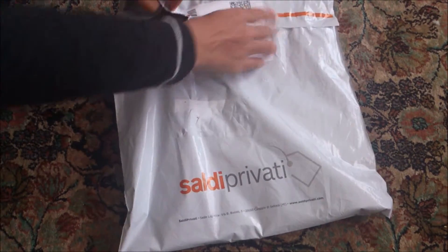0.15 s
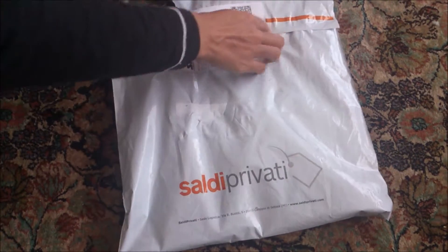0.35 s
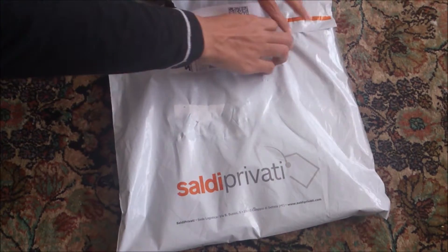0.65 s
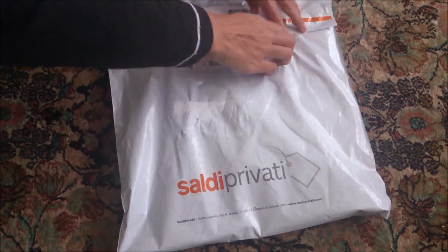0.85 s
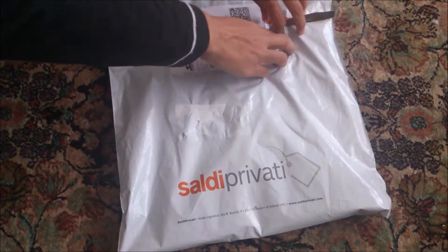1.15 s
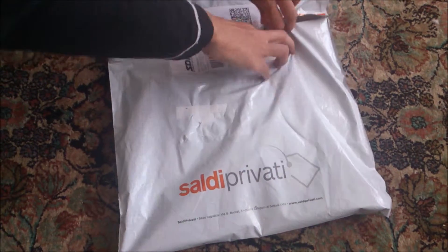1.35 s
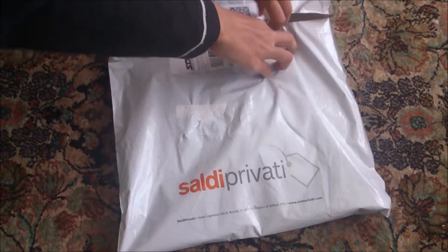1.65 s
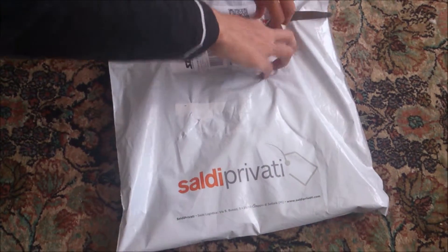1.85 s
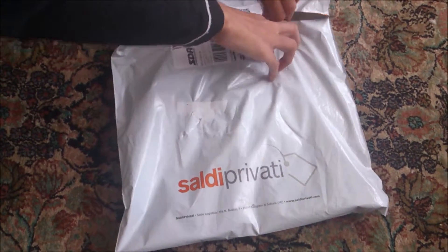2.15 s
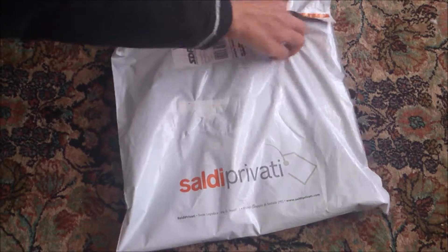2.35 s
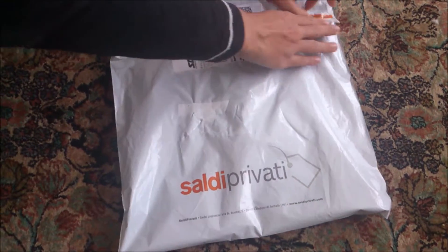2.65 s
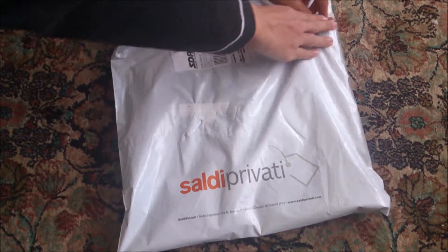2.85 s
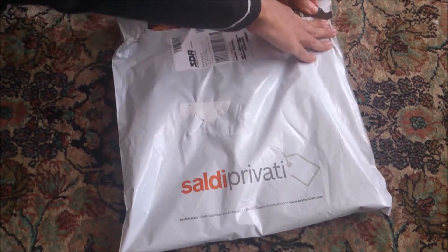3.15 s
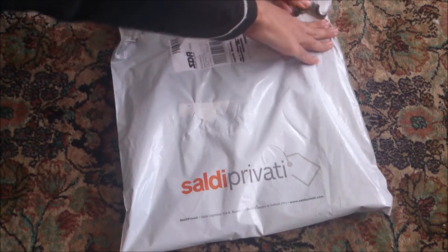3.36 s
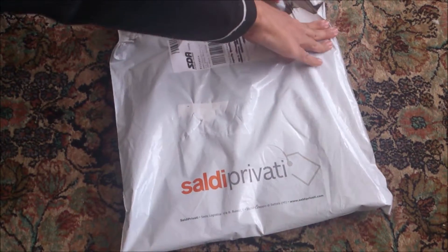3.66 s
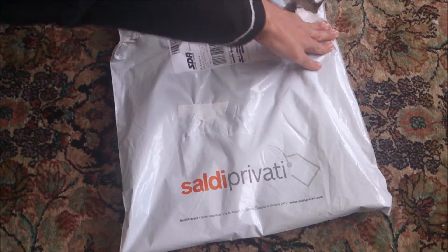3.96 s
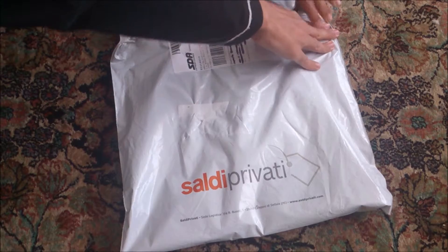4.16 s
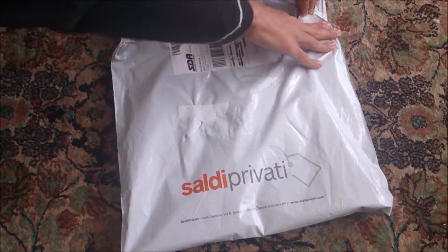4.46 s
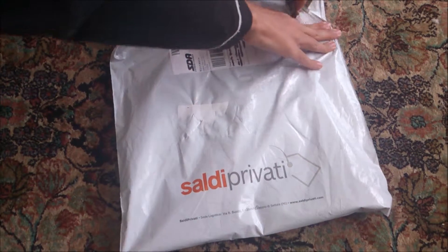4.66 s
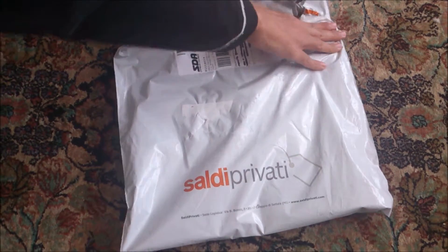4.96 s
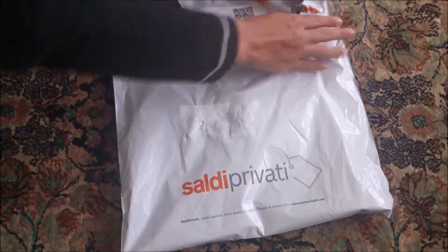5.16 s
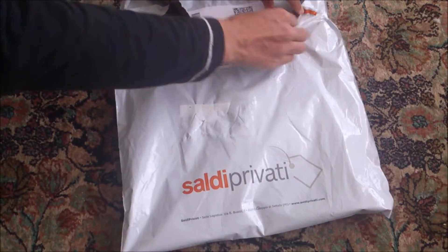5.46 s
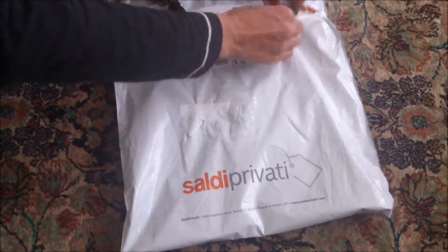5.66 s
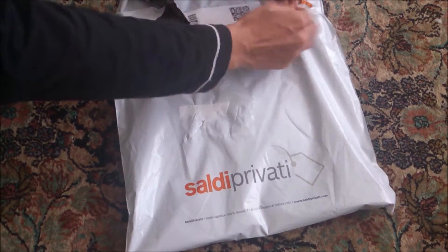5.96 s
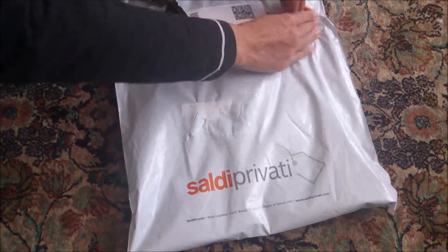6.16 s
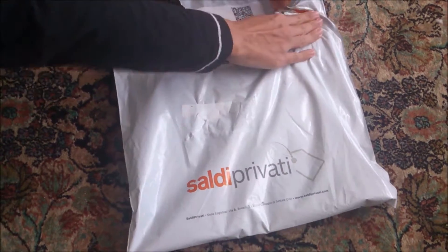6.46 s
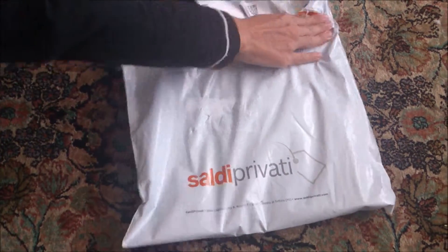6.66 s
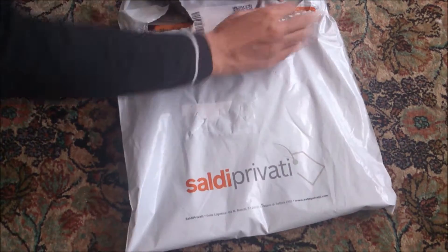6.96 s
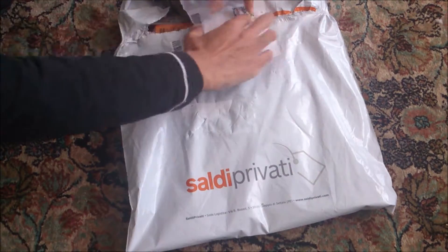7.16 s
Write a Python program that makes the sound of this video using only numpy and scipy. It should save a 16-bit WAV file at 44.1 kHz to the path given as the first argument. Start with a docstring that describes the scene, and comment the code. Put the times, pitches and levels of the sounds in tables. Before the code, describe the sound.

Thin plastic packaging crackles and rustles close up as fingers pick and pull it open, its crisp snaps ringing briefly off indoor walls.

```python
"""Opening a plastic mailer bag

Two hands pick at the taped flap of a plastic mailer bag on a carpet and tug it open, in a fairly live room.
Sharp snaps, some following each other in quick runs and some repeated by a flutter echo about 12 ms apart,
stand over tiny crinkles and sliding film; two hard pulls stand out. Each snap is a short push that rings a
small facet, the panel around it and the air in the bag. Early echoes, a diffuse tail and one low standing wave
form the room; faint noise and a whine lie beneath."""
import sys
import numpy as np
from scipy import signal
from scipy.fft import rfft, irfft
from scipy.io import wavfile
from scipy.ndimage import uniform_filter1d

SR = 44100
rng = np.random.default_rng(int(sys.argv[2]) if len(sys.argv) > 2 else 0)


def to_wav(sig):
    """Store sig (one row per channel, or 1-D mono) as 16-bit WAV at the path in sys.argv[1].

    Samples outside -1..1 are clipped; the rate is SR.
    """
    pcm = np.clip(np.atleast_2d(sig), -1, 1) * 32767
    pcm = np.round(pcm).astype(np.int16)
    wavfile.write(sys.argv[1], SR, pcm.T)  # frames by channels


N = 322371
TIME = np.arange(N) / SR  # s
FRAME = 1024  # samples in the impulse response of one patch of film
FRAME_S = np.arange(FRAME) / SR
FRAME_HZ = np.arange(FRAME // 2 + 1) * SR / FRAME + 1  # 1 Hz up, to avoid division by zero

# Spectrum of the background noise. Each row: frequency in Hz, relative density in dB.
NOISE_SPECTRUM = [(25, -17), (50, -8), (100, 3.5), (220, -1), (350, 3.5), (560, -4.5), (750, -3),
                  (1100, -8.5), (3100, -6.5), (6200, -2.5), (11000, -9), (16000, -13.5)]
NOISE_DB = -60  # mean level, about which it wavers
WHINE_HZ, WHINE_DB = 12306, -74.5

# Diffuse tail of the room by band. Each row: centre in Hz, 60 dB decay time in s, level in dB.
ROOM_BANDS = [(144, 0.4, 7.5), (530, 0.65, 1), (1510, 0.7, 1), (3500, 0.78, 0.5), (6370, 0.68, -3),
              (9900, 0.6, -2.5), (15800, 0.6, -0.5)]
# Early echoes from nearby surfaces. Each row: delay in s, level in dB.
EARLY_ECHOES = [(.0028, -25), (.0093, -13), (0.012, -34)]
ROOM_MODE_HZ, ROOM_MODE_T60, ROOM_MODE_DB = 360, 0.29, -17  # Hz, s, dB

# Bumps of the parcel on the carpet. Each row: start in s, level in dB, starting pitch in Hz.
PARCEL_BUMPS = [(0.5, -57, 132), (2.13, -68, 190), (2.244, -69, 181), (4.615, -61, 84.3),
                (5.335, -66, 139.9), (6.955, -61, 102)]

# Puffs of the slack bag giving under a hand. Each row: start in s, level in dB.
SLACK_PUFFS = [(.795, -24.5), (1.666, -24), (2.138, -23), (2.248, -22), (2.43, -24.5), (2.475, -30.5),
               (3.999, -19), (4.011, -20), (6.645, -23), (6.675, -18.5)]
PUFF_HZ, PUFF_Q, PUFF_DECAY_S = 410, 0.31, 0.028

# Narrow resonances excited by fingers dragging over the taut flap. Each row: frequency in Hz, Q, level in dB.
DRAG_RESONANCES = [(2550, 5.3, -69.5), (6900, 9.9, -61)]
DRAG_START_S, DRAG_LENGTH_S = .16, .52

# Resonances of the film: sharp crease edge, panel, air pocket, slack of the whole bag.
EDGE_HZ, EDGE_Q, EDGE_DB = 9200, 0.98, -20  # dB relative to the facet, in crinkles and sliding
PANEL_HZ, PANEL_Q = 1980, 0.77
POCKET_HZ, POCKET_Q = 815, 0.94
SLACK_HZ, SLACK_Q, SLACK_DB = 380, 0.57, -10.5  # dB relative to the air pocket

# Pushes and pulls of the hands on the film. Each row: start in s, length in s, effort in dB,
# central facet ring in Hz, panel and air pocket in dB relative to the facet; crinkles shift the pocket slightly.
HAND_GRIPS = [(0, .05, -54, 5800, -11, -13), (0.242, .1, -61, 5880, -7, -7), (.6, .15, -58, 6200, -9, -14),
              (0.796, .14, -54, 6300, -9.5, -13), (.97, .04, -49, 6540, -14.5, -11),
              (1.1, .22, -49, 6700, -15.5, -18.5), (1.358, .03, -41, 6400, -7.5, -18),
              (1.44, .06, -55, 6560, -10, -8.5), (1.675, .012, -44, 6670, -21, -19),
              (1.746, .2, -51.5, 6140, -16, -17.5), (1.975, .035, -45, 5800, -13, -34),
              (2.06, .13, -53.5, 6000, -4.5, -7), (2.26, .1, -47.5, 5860, -25, -15.5),
              (2.4, .07, -48, 6100, -8, -13), (2.72, .17, -56.5, 5570, -5.5, -13),
              (2.97, .05, -40.5, 5860, -15.5, -14.5), (3.1, .21, -52.5, 6300, -9.5, -16),
              (3.35, .06, -47, 5400, -8.5, -10), (3.582, .19, -52.5, 6360, -26, -24),
              (4.28, .07, -56.5, 5400, -10, -20), (4.385, .13, -49.5, 6060, -8.5, -12.5),
              (4.561, .05, -48, 6100, -15, -21), (4.66, .06, -52, 7000, -13, -35),
              (4.775, .025, -33, 6600, -11.5, -26), (4.879, .24, -52, 6500, -11, -18),
              (5.145, .045, -46, 6300, -10.5, -13.5), (5.52, .12, -53, 6240, -12, -12),
              (5.73, .07, -48, 6100, -9, -15), (5.93, .14, -48.5, 5900, -8, -16.5),
              (6.11, .08, -53, 5930, -10, -6.5), (6.235, .075, -44.5, 6640, -11.5, -13.5),
              (6.54, .04, -57, 5000, -20, -20), (6.655, .023, -27, 6700, -16, -17),
              (6.71, .045, -40, 6500, -10, -12), (6.865, .05, -45, 6400, -5.5, -10.5),
              (7.13, .18, -59, 6080, -4.5, -15.5)]
GRIP_ATTACK_DB_PER_S, GRIP_RELEASE_DB_PER_S = 620, 290
# Hands lying on the bag between grips. The one row: effort in dB, central facet ring in Hz,
# panel and air pocket in dB relative to the facet; crinkles shift the pocket slightly.
RESTING_HANDS = (-74, 5802, 4, -1)

# Sharp snaps of the film, including flutter echoes that repeat a snap about 12 ms later. Each row: start in s,
# level in dB, facet ring in Hz, crease edge in dB, panel in dB and air pocket in dB relative to the facet, all
# dB before common offsets.
FILM_SNAPS = [(0.0556, -23, 6800, -16, -10, -29), (.2469, -16, 5800, -28, -21, -19),
              (.319, -22, 5470, -27, -7, -15), (0.6487, -15.5, 6000, -16, -29, -40),
              (.879, -17, 6330, -20, -29, -28), (.936, -20.5, 6400, -20, -27, -32),
              (0.9722, -15.5, 5670, -2.5, -14, -17), (1.084, -23.5, 5640, -7, -9, -7),
              (1.1096, -23, 7450, -25, -5, -17), (1.1294, -9.5, 6840, -25, -18, -18.5),
              (1.1522, -11, 6080, -14, -30, -24), (1.173, -18, 6170, -25, -31, -30),
              (1.1956, -4, 6600, -30, -35, -27), (1.3115, -13, 7800, -25, -30, -23),
              (1.3572, -10.5, 6040, -25, -8, -30), (1.3738, -17.5, 4870, 0, 0, -29),
              (1.388, -12, 5100, -25, -16, -23), (1.405, -9.5, 5400, -9, -16, -20),
              (1.5203, -18.5, 6500, -10, -14, -15), (1.6664, -13, 6100, -7, -5, -6.5),
              (1.6753, -12.5, 6300, -9, -8, -8.5), (1.6822, -11, 6800, -25, -13, -25),
              (1.748, -25, 6700, -14, -12, -14), (1.7737, -20, 6500, -20, -21, -33),
              (1.803, -15, 6000, -16, -23, -13), (1.8167, -32.5, 6300, -20, -8, -14),
              (1.8573, -24, 6300, -17, -10, -12), (1.901, -16.5, 6360, -25, -25, -25),
              (1.9218, -13, 5300, -11, -10, -20), (1.938, -24, 6400, 0, -3, -23),
              (1.9526, -21, 5700, -6, -13, -23), (1.9682, -8, 5400, -27, -27, -35),
              (1.9756, -14, 6200, -25, -14, -27), (1.982, -9, 6700, -25, -31, -42),
              (2.029, -21.5, 7150, 2, -10, -34), (2.101, -20.5, 5200, -22, -14, -32),
              (2.1374, -12.5, 5400, -25, -16, -14), (2.1876, -20, 6293, -6, -22, -17),
              (2.248, -6, 5463, -13.5, -12, -25), (2.3103, -17, 6800, -18, -16, -38),
              (2.3285, -8.5, 6900, -4.5, -9.5, -41), (2.3378, -20, 6500, -10, -10, -38),
              (2.4178, -16, 6550, -14, -18, -39), (2.4336, -17, 6000, -25, -4.5, -9),
              (2.4837, -17, 5630, -14, -6, -16), (2.592, -23, 7200, -22.5, -43, -10),
              (2.7126, -18, 6260, -6, -16, -23), (2.726, -30, 6800, -4, -19, -26),
              (2.7787, -16, 5560, -13, -35, -30), (2.7863, -18.5, 5600, -25, -23, -26),
              (2.8207, -23, 5900, -25, -27, -36), (2.8413, -23, 5900, -16, -28, -33),
              (2.8621, -13, 7500, -22, -17, -21), (2.9442, -5.5, 6800, -28, -12.5, -22),
              (2.9497, -18, 7000, -25, -17, -38), (2.9738, -17, 7600, -5, -5, -32),
              (2.9825, -9, 7200, -25, -28, -24), (2.9863, -10, 6500, -17, -25, -40),
              (2.9933, -10, 6500, -25, -13, -28), (3.0107, -10.5, 6600, -27, -9, -34),
              (3.089, -18.5, 5900, -25, -4, -30), (3.1629, -13.5, 5160, -5, -10, -16),
              (3.176, -13.5, 5330, -6, -15, -22), (3.1864, -18, 7000, -13, -25, -25),
              (3.246, -8.5, 6500, -24, -31, -28), (3.26, -20, 7500, -9, -30, -36),
              (3.2775, -23, 5600, 2, -24, -28), (3.297, -19, 5500, -1.5, -28, -30),
              (3.3508, -20, 6800, -15, -5, -10), (3.3609, -5.5, 4760, -6, -7.5, -17),
              (3.3728, -13, 4600, -4, -19, -27), (3.4007, -15.5, 6720, -23, -15, -13),
              (3.4327, -15, 5800, -30, -17, -26), (3.5548, -14.5, 5700, -6, -8, -14.5),
              (3.563, -14.5, 5600, -9, -8, -17), (3.6025, -21, 5960, -25, -9, -26),
              (3.6587, -20.5, 6900, -3, -11, -25), (3.7128, -11.5, 5700, -11, -16, -22),
              (3.7264, -19, 5760, -17, -20, -28), (3.752, -13.5, 5690, -8, -11, -35),
              (3.7684, -7, 4900, -9, -5.5, -35), (3.784, -10, 4860, -10, -1.5, -32),
              (3.9688, -21, 6900, -10, -19, -9), (3.9787, -13.5, 6920, -16, -7, -14),
              (3.9883, -5, 5830, -24, -15.5, -18), (3.9995, -7, 7040, -23, -5, -8.5),
              (4.0122, -7, 6800, -25, -21, -8), (4.1666, -25, 6800, -12, -20, -16),
              (4.2268, -30, 5650, -22, -17, -16), (4.244, -21, 5300, -20, -18, -12),
              (4.3, -17, 5870, -16, -31, -33), (4.385, -19, 5600, -20, -22, -24),
              (4.3904, -13.5, 8040, -18, -0.5, -4.5), (4.395, -23, 7900, -11, 0, 2),
              (4.3996, -17, 6540, -28, -18, -26), (4.4375, -20, 6100, -14, -6, -28),
              (4.4453, -18.5, 6200, -15, 3, -5), (4.458, -19, 5200, -13, -3, -16),
              (4.4772, -18, 6100, -25, -23, -30), (4.4865, -13, 6650, -25, -30, -30),
              (4.5015, -18, 6900, -18, -17, -17), (4.5175, -19, 6900, -16, -21, -14),
              (4.5575, -21, 7300, -5, -10, -18), (4.569, -20, 7400, -3, -5, -20),
              (4.5817, -10, 5750, -7, -15, -22), (4.588, -11, 5330, -25, -2, -10.5),
              (4.6006, -22, 6300, -20, -14, -31), (4.643, -17, 6900, -4, -24, -24),
              (4.6484, -12.5, 6500, 0, -11, -31), (4.7181, -13, 6340, -3, -28, -32),
              (4.7257, -21, 6900, -10, -28, -36), (4.7561, 7, 6800, -23, -8.5, -21),
              (4.7681, 8, 6120, -27, -22, -24), (4.781, -2, 6000, -25, -27, -28),
              (4.7926, -3, 6860, -18, -15, -22), (4.831, -6.5, 6485, -5, -26, -26),
              (4.8555, 7, 6150, -27, -7, -21.5), (4.8839, -5, 6200, -25, -24, -32),
              (5.048, -15.5, 7000, -2, -23, -33), (5.1466, -14, 5660, -23, -13, -33),
              (5.152, -15.5, 6150, -18, -5, -20), (5.1664, -20, 6800, -10, -11, -19),
              (5.1911, -19.5, 6100, -5, -3.5, -32), (5.3829, -24.5, 6900, -29, -27, -37),
              (5.439, -21, 5260, -10, -4.5, -12.5), (5.4994, -19, 5460, -28, -9, -36),
              (5.5049, -20, 6000, -14, -22, -36), (5.509, -25, 7300, -8, -20, -34),
              (5.5248, -20, 6470, -18, -20, -27), (5.5396, -19, 6350, -28, -8, -15),
              (5.579, -25, 6800, -13, -22, -28), (5.7174, -9, 6400, -28, -11.5, -16.5),
              (5.7468, -19, 6200, -19, -26, -35), (5.762, -11.5, 5450, -25, -25, -34),
              (5.7808, -27, 5800, -17, -21, -24), (5.8054, -20, 6100, -27, -11, -24),
              (5.8564, -12, 6410, -10, -11, -11.5), (5.9218, -15, 6640, -14, -12, -20),
              (5.926, -18.5, 6500, -14, -8, -17), (5.9601, -8.5, 5570, -17, -10.5, -17),
              (5.9833, -18, 5400, -28, -19, -36), (6.0013, -18, 7570, -27, -27, -26),
              (6.017, -15.5, 7580, -25, -27, -30), (6.0251, -19, 7000, -8, -25, -15),
              (6.046, -12.5, 5100, -5.5, -6, -38), (6.06, -19, 5800, -13, -10, -40),
              (6.0698, -23, 6500, -16, -3, -17), (6.0826, -24, 6400, -28, -24, -34),
              (6.1176, -16, 6060, -30, -26, -38), (6.125, -15, 6360, -6, -27, -28),
              (6.1965, -12, 6350, -1, -7, -36), (6.2417, -16, 5530, -10, -7, -23),
              (6.2614, -16, 5490, -15, -14, -26), (6.2697, -25, 6400, -22, -14, -12),
              (6.5743, -18.5, 6060, 1.5, -10, -33), (6.5975, -7, 7660, -15, -20, -28),
              (6.5999, -4, 5460, -2.5, -10, -15.5), (6.6193, -12, 7400, -12, -23, -30),
              (6.6206, -4, 5540, -4, -10.5, -16), (6.6425, 1.5, 8600, -25, -7.5, -24),
              (6.6544, -6, 7400, -10, -14, -24), (6.661, -4, 6000, 0.5, -10, -13),
              (6.666, -3.5, 5500, -6, -16, -27), (6.6783, -11, 8200, -12, -20, -26),
              (6.721, -11, 8000, -6, -9, -29), (6.731, -9.5, 8000, -8, -16, -19),
              (6.8223, -17, 6490, -14, -11, -29), (6.89, -10, 7560, -18, -27, -29),
              (6.895, -10.5, 7200, -27, -24, -18), (6.937, -14, 7410, -31, -6, -4),
              (7.2214, -22, 7300, -24, -21, -31), (7.2412, -20.5, 6900, -10, -10.5, -22)]

CEILING = 1.25  # amplitude at which the microphone saturates
MIC_HZ, TOP_HZ = 12840, 15900  # gentle roll-off, steep cut


def undb(db):
    """Amplitude ratio of a level in dB."""
    return 10 ** (np.asarray(db) / 20)


def unit(x):
    """Normalization: scale to an rms of 1."""
    return x / np.sqrt(np.mean(np.abs(x) ** 2))


def add(out, at_s, sound):
    """Superposition: mix a sound in at a time."""
    start = max(int(at_s * SR), 0)
    part = out[start:start + len(sound)]
    part += sound[:len(part)]


def walk(rate):
    """Smoothed random process: levels held for 1 / rate s and slewed twice, with a spread near 1."""
    hold = int(SR / rate)
    steps = np.repeat(rng.standard_normal(N // hold + 1), hold)
    slewed = uniform_filter1d(uniform_filter1d(steps, hold), hold)
    return unit(slewed)[:N]


def resonance(hz, q):
    """Damped resonance: a broad, steep-sided power response with a mean of 1."""
    detuning = FRAME_HZ / hz - hz / FRAME_HZ
    return unit(1 / (1 + (q * detuning) ** 2)) ** 2


def ring(power):
    """Minimum phase: the causal impulse response that has this power spectrum, by folding its cepstrum."""
    cepstrum = irfft(np.log(power + 1e-7) / 2)
    cepstrum[1:FRAME // 2] *= 2
    cepstrum[FRAME // 2 + 1:] = 0
    return irfft(np.exp(rfft(cepstrum)))


def background():
    """Stationary noise shaped by its spectrum and wavering slightly, plus a thin, high, unsteady whine."""
    hz, db = np.transpose(NOISE_SPECTRUM)
    bins_hz = np.arange(N // 2 + 1) * SR / N + 1
    shape = undb(np.interp(np.log(bins_hz), np.log(hz), db))
    noise = irfft(rfft(rng.standard_normal(N)) * shape, N)
    whine = np.sin(2 * np.pi * np.cumsum(WHINE_HZ + 22 * walk(150)) / SR)
    return undb(NOISE_DB + 2.02 * walk(6.8)) * unit(noise) + undb(WHINE_DB) * unit(whine)


def room_tail(build_s=0.0061):
    """Diffuse reverberation: noise that builds up in milliseconds and decays at its own rate in each band."""
    t = TIME[:SR]
    bins_hz = np.arange(SR // 2 + 1) + 1
    noise = rfft(rng.standard_normal(SR))
    centres = np.log(np.array(ROOM_BANDS)[:, 0])
    tail = 0
    # overlapping triangular bands on a logarithmic frequency axis
    for share, (_, t60, db) in zip(np.eye(len(ROOM_BANDS)), ROOM_BANDS):
        band = irfft(noise * np.interp(np.log(bins_hz), centres, share))
        fade = np.exp(-np.log(1000) * t / t60) * (1 - np.exp(-(t / build_s) ** 2))
        tail = tail + undb(db) * band * fade / np.linalg.norm(fade)
    return tail


def room_mode():
    """Standing wave: a low, exponentially damped sine as an impulse response."""
    t = TIME[:SR]
    mode = np.sin(2 * np.pi * ROOM_MODE_HZ * t) * np.exp(-np.log(1000) * t / ROOM_MODE_T60)
    return undb(ROOM_MODE_DB) * mode / np.linalg.norm(mode)


def bumps(swell_s=0.018, sink_s=0.07):
    """Low-frequency thuds of the filled bag: short swells that sink in pitch as it settles."""
    out, t = np.zeros(N), TIME[:SR // 8]
    swell = (t / swell_s * np.exp(1 - t / swell_s)) ** 2
    for at_s, db, hz in PARCEL_BUMPS:
        cycles = np.cumsum(hz * np.exp(-t / sink_s)) / SR
        add(out, at_s, undb(db) * swell * np.sin(2 * np.pi * cycles))
    return out


def flaps():
    """Heavily damped resonance: a decaying noise burst gives a short, dull puff of the slack film."""
    out, t = np.zeros(N), TIME[:SR // 8]
    for at_s, db in SLACK_PUFFS:
        burst = rng.standard_normal(len(t)) * np.exp(-t / PUFF_DECAY_S)
        puff = signal.fftconvolve(burst, ring(resonance(PUFF_HZ, PUFF_Q)))
        add(out, at_s, undb(db) * puff / np.linalg.norm(puff))
    return out


def drag(waver_db=3):
    """Friction noise through narrow resonances: a hollow hiss swells and fades as fingers cross the flap."""
    swell = np.sin(np.pi * np.clip((TIME - DRAG_START_S) / DRAG_LENGTH_S, 0, 1))
    hiss = 0
    for hz, q, db in DRAG_RESONANCES:
        rub = rng.standard_normal(N)
        hiss = hiss + undb(db) * signal.oaconvolve(rub, ring(resonance(hz, q)))[:N]
    return hiss * swell * undb(waver_db * walk(24))


def film(facet_hz, edge_db, panel_db, pocket_db, facet_q=1.61, size_spread=0.19, wrinkle_db=3.0):
    """Sum of resonances: power spectrum of one patch, from facet, crease edge, panel, air pocket and slack."""
    # a larger patch has a lower panel, pocket and slack
    size = np.exp(size_spread * (2 * rng.random() - 1))
    parts = [(facet_hz, facet_q, 0),
             (EDGE_HZ, EDGE_Q, edge_db),
             (PANEL_HZ / size, PANEL_Q, panel_db),
             (POCKET_HZ / size, POCKET_Q, pocket_db),
             (SLACK_HZ / size, SLACK_Q, pocket_db + SLACK_DB)]
    body = sum(undb(db) ** 2 * resonance(hz, q) for hz, q, db in parts)
    # wrinkles give every patch narrow peaks of its own
    ripple = rng.standard_normal(len(FRAME_HZ))
    wrinkles = unit(uniform_filter1d(uniform_filter1d(ripple, size=5), size=5))
    return unit(undb(wrinkle_db * wrinkles)) ** 2 * body


def handling():
    """Addition of powers: grips build quickly, hold and let go slower; colours average by their power.

    Returns the effort in dB, facet ring in Hz, and panel and air pocket in dB, over time."""
    powers, colours = [np.full(N, undb(RESTING_HANDS[0]) ** 2)], [RESTING_HANDS[1:]]
    for start_s, length_s, db, *colour in HAND_GRIPS:
        before_db = GRIP_ATTACK_DB_PER_S * (start_s - TIME)
        after_db = GRIP_RELEASE_DB_PER_S * (TIME - start_s - length_s)
        below_db = np.clip(np.maximum(before_db, after_db), 0, 100)
        powers.append(undb(db - below_db) ** 2)
        colours.append(colour)
    total = sum(powers)
    return 10 * np.log10(total), *(np.transpose(colours) @ np.array(powers) / total)


def sliding(hands, slide_db=-10.5, stick_db=3.5, hiss_q=1.0, fizz_hz=13500, fizz_q=2.2, fizz_db=-5,
            rub_hz=150, rub_db=-12, size=2048):
    """Friction noise: film catches and slips over film and palm, its colour shifting from patch to patch."""
    effort_db, facet_hz, panel_db, pocket_db = hands
    touch = np.sin(np.pi * np.arange(size) / size)
    hiss = np.zeros(N)
    # half-overlapping touches, each on a new patch
    for i in range(0, N, size // 2):
        patch = film(facet_hz[i], EDGE_DB, panel_db[i], pocket_db[i], facet_q=hiss_q, wrinkle_db=3.5)
        fizz = undb(fizz_db) ** 2 * resonance(fizz_hz, fizz_q)
        palm_rub = undb(pocket_db[i] + rub_db) ** 2 * resonance(rub_hz, SLACK_Q)
        rub = touch * rng.standard_normal(size)
        add(hiss, i / SR, signal.fftconvolve(rub, ring(patch + fizz + palm_rub)))
    return hiss * undb(effort_db + slide_db + stick_db * walk(90))


def buckle(crunch_db, run_s=0.0021, bounce_s=0.00131, bounce_db=-9.5):
    """Impulsive excitation: a crease flips with a tick, the fold runs on, and the tick bounces off the parcel."""
    push = rng.standard_normal(FRAME) * np.exp(-FRAME_S / run_s)
    push /= np.linalg.norm(push)
    push[int(bounce_s * SR * rng.uniform(.85, 1.15))] += undb(bounce_db)
    push *= undb(crunch_db)  # scales both the run and the bounce
    push[0] += 1
    # the push is broadband: its energy is spread evenly, apart from fine ripple
    power = np.abs(rfft(push)) ** 2
    whitening = ring(1 / uniform_filter1d(power, size=70))
    return signal.fftconvolve(push, whitening)[:FRAME]


def crinkles(hands, spread_db=5, facet_spread=0.32, pocket_gain_db=-1, count=1100):
    """Random point process: tiny buckles in facets of many sizes come thicker as the hands work harder."""
    effort_db, facet_hz, panel_db, pocket_db = hands
    density = undb(.75 * effort_db)
    density *= count / density.sum()  # buckles per sample
    # one buckle per unit of accumulated density, with jitter
    places = np.arange(count) + 2 * rng.random(count) - 1
    moments = np.interp(places, np.cumsum(density), np.arange(N)).astype(int)
    strengths = unit(undb(spread_db * np.minimum(rng.exponential(size=count), 2.6)))
    sizes = np.exp(facet_spread * (2 * rng.random(count) - 1))
    out = np.zeros(N)
    for i, strength, size in zip(moments, strengths, sizes):
        tone = ring(film(facet_hz[i] / size, EDGE_DB, panel_db[i], pocket_db[i] + pocket_gain_db))
        # crowded buckles are weaker, so that their summed power follows the effort
        gain = strength * undb(effort_db[i]) / np.sqrt(density[i])
        add(out, i / SR, gain * irfft(rfft(tone) * rfft(buckle(-4.5))))
    return out


def snaps(gain_db=0.42, edge_gain_db=2.5, panel_gain_db=-2.0, pocket_gain_db=-2, crunch_db=-5.5,
          crunch_slope=0.26, room_db=-4.5, tick_lead_s=0.00091, tick_db=-18):
    """Impulsive radiation: loud snaps, the harder the cleaner, each with a weak tick just before it.

    Returns the near sound and the sound sent into the room."""
    direct, sent = np.zeros(N), np.zeros(N)
    for at_s, db, facet_hz, edge_db, panel_db, pocket_db in FILM_SNAPS:
        colour = facet_hz, edge_db + edge_gain_db, panel_db + panel_gain_db, pocket_db + pocket_gain_db
        tone = undb(db + gain_db) * ring(film(*colour, wrinkle_db=2.0))
        add(direct, at_s - tick_lead_s * rng.uniform(0.35, 2.0), undb(tick_db) * tone)
        add(direct, at_s, signal.fftconvolve(buckle(crunch_db - crunch_slope * db), tone))
        # the film radiates a different mix of its peaks towards the walls
        add(sent, at_s, undb(db + gain_db + room_db) * ring(film(*colour)))
    return direct, sent


def scene(crinkle_room_db=-2):
    """Superposition of near sound, its early echoes, the room's response to the film, and the background."""
    direct, sent = snaps()
    hands = handling()
    bed = crinkles(hands) + sliding(hands) + drag()
    near = direct + bed + flaps() + bumps()
    into_room = sent + undb(crinkle_room_db) * bed
    room = signal.oaconvolve(into_room, room_tail() + room_mode())[:N]
    out = near + room + background()
    for delay_s, db in EARLY_ECHOES:
        add(out, delay_s, undb(db) * near)
    return out[None]


def record(dry):
    """Saturation and band limits: the microphone rounds hard snaps and rolls off; a steep filter cuts the top."""
    rounded = CEILING * np.tanh(dry / CEILING)
    soft = signal.sosfilt(signal.butter(2, MIC_HZ, fs=SR, output="sos"), rounded)
    return signal.sosfilt(signal.ellip(10, .2, 80, TOP_HZ, fs=SR, output="sos"), soft)


dry = scene()
out = record(dry)
to_wav(out)
```